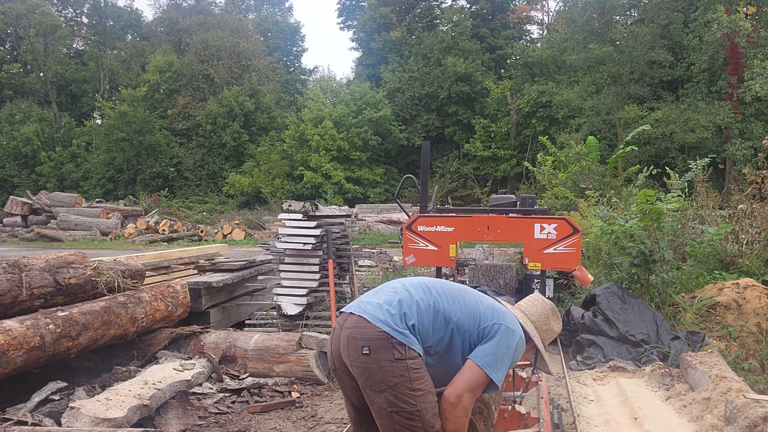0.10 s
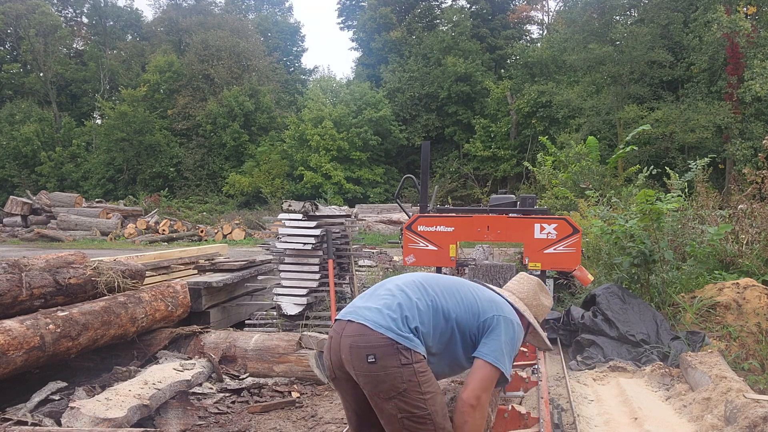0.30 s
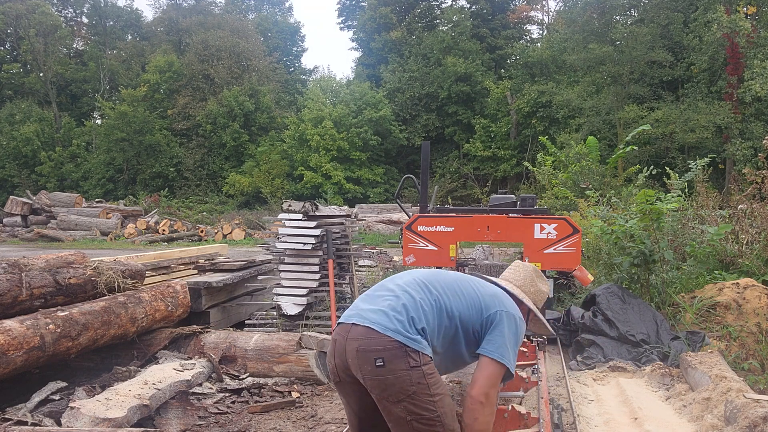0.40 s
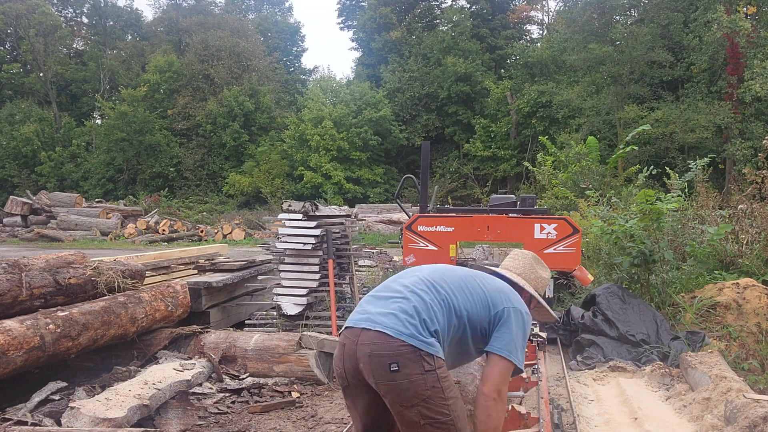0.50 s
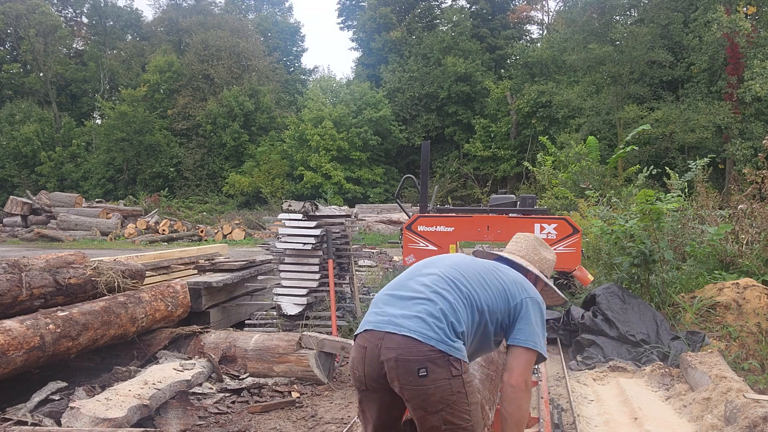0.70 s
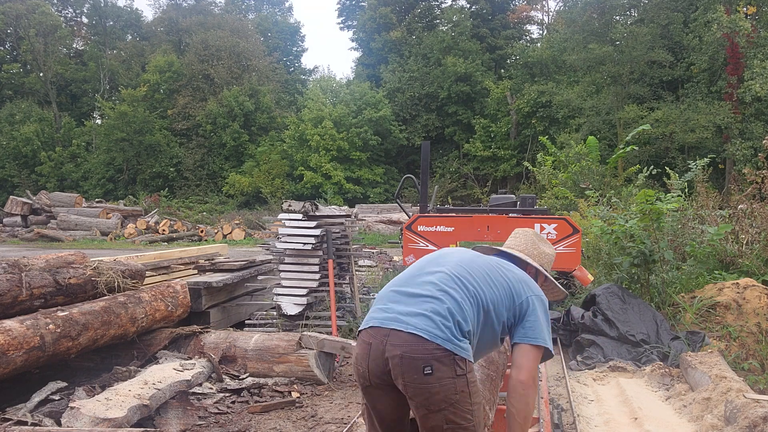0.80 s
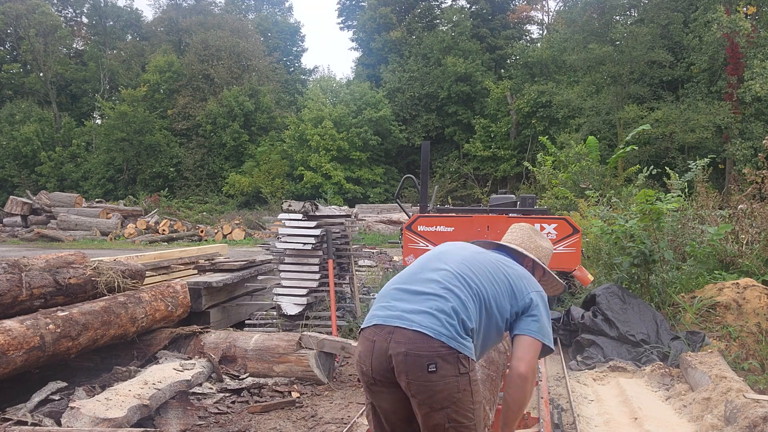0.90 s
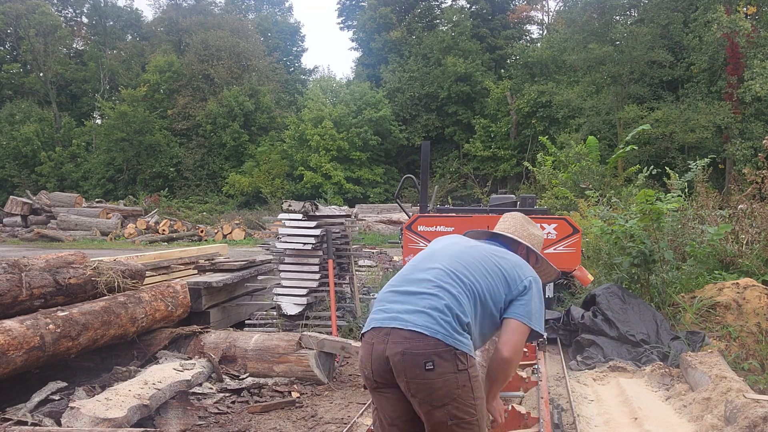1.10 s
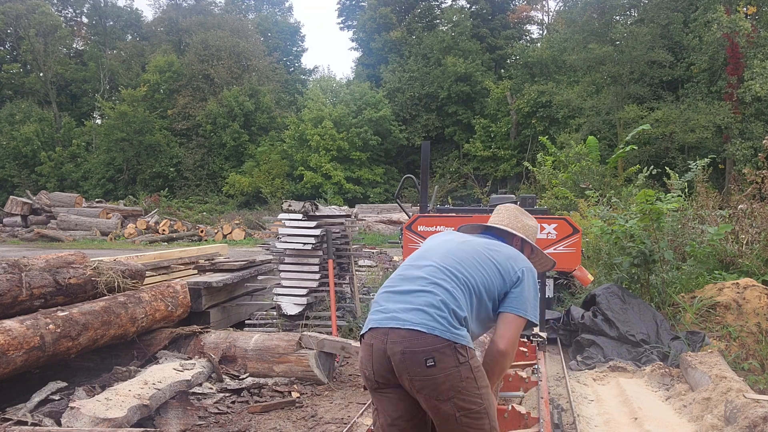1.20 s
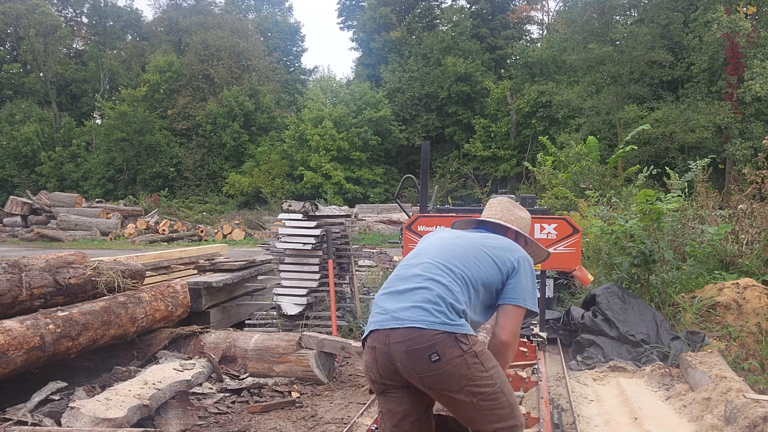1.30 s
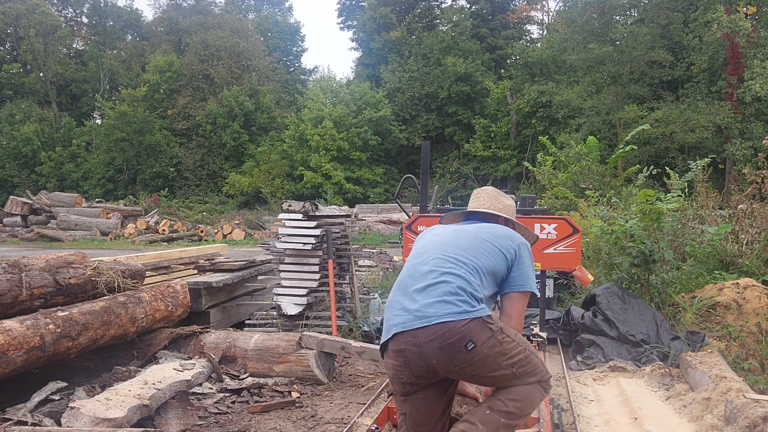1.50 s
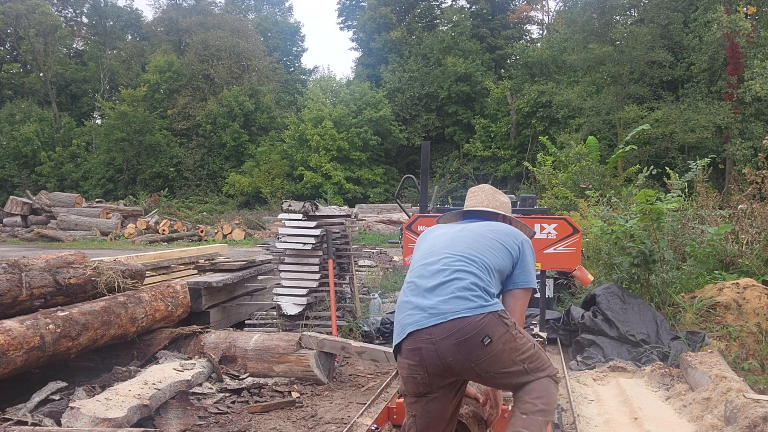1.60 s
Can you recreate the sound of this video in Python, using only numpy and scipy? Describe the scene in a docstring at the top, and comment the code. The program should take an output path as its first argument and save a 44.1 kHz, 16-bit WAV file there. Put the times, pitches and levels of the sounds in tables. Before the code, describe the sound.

A heavy log thumps onto a steel sawmill bed with crunching bark, over a faint cricket chorus

```python
"""In a wooded sawmill yard, a heavy log drops onto a steel bed: one deep thump, a boom and crunching bark.
Short pushes set the log and bed ringing; grains of noise make the bark, dust, scraping and scuffing.
Wobbling tones make the steel clanks, and more pushes a soft wooden knock; a faint echo tail follows them all.
Behind lie shaped-noise rumble and air, a cricket chorus of fluttering noise with nearer pulsed tones,
very high katydid ticks, and thin bird whistles made of gliding tones."""
import sys
import numpy as np
from scipy import signal
from scipy.fft import rfft, irfft
from scipy.io import wavfile

SR = 44100
rng = np.random.default_rng(int(sys.argv[2]) if len(sys.argv) > 2 else 0)


def waveform_to_disk(signal):
    """Save audio, clipped to [-1, 1], as 16-bit WAV at the path in sys.argv[1]."""
    frames = np.transpose(np.atleast_2d(signal))
    scaled = np.clip(frames, -1, 1) * 32767
    samples = np.round(scaled).astype(np.int16)
    wavfile.write(sys.argv[1], SR, samples)


N = 70560
T = np.arange(N) / SR  # time of each sample [s]


def from_db(db):
    """Turn decibels into a gain."""
    return 10 ** (np.asarray(db) / 20)


def rms_one(x):
    """Scale a sound to an average strength (rms) of 1."""
    return x / np.sqrt(np.mean(x ** 2) + 1e-20)


def level(rows):
    """Draw a gain curve through (time [s], level [dB]) points."""
    return from_db(np.interp(T, *np.transpose(rows)))


def pan(db):
    """Left and right gains that differ by this many dB; above zero is to the left."""
    return from_db(np.array([[db], [-db]]) / 2)


def at_hz(points, hz):
    """Read a table between its points, along a logarithmic frequency axis."""
    table_hz, value = np.transpose(points)
    return np.interp(np.log(hz + 1), np.log(table_hz), value)


def drift(rate):
    """Smooth random wander of rms 1; a higher rate [Hz] wanders faster."""
    r = np.exp(-2 * np.pi * rate / SR)
    wander = signal.lfilter([1], [1, -2 * r, r * r], rng.standard_normal(2 * N))
    return rms_one(wander[N:])  # the first half lets the filter settle


def tone(hz):
    """A sine wave that follows a changing pitch."""
    return np.sin(2 * np.pi * np.cumsum(hz) / SR)


def coloured(pair, spectrum):
    """Shape two unrelated signals into a stereo sound of rms 1 with this spectrum."""
    # how alike left and right are: (frequency [Hz], likeness [0 = unrelated, 1 = the same])
    likeness = [(25, 0.56), (60, 1), (250, 0.9), (500, 0.7), (1100, 0.019), (2200, 0.29), (4500, 0),
                (16000, 0)]
    hz = np.arange(N // 2 + 1) * SR / N
    alike = np.clip(at_hz(likeness, hz), -1, 1)
    mid, side = rfft(pair) * from_db(at_hz(spectrum, hz))
    shared = np.sqrt(1 + alike) * mid
    opposed = np.sqrt(1 - alike) * side * [[1], [-1]]
    return rms_one(irfft(shared + opposed, N))


def noise(spectrum):
    """Smooth stereo noise with a given spectrum."""
    return coloured(rng.standard_normal((2, N)), spectrum)


def grains():
    """Two streams of tiny fractures: clicks of random size and sign at random moments."""
    grains_per_s, spread_db = 5000, 2.5
    sizes = from_db(spread_db * np.minimum(rng.exponential(1, (2, N)), 4))
    signed = sizes * rng.choice([-1, 1], (2, N))
    return rms_one(signed * (rng.random((2, N)) < grains_per_s / SR))


def ring(force, modes):
    """A force sets a body's modes ringing: each is a resonance that takes t60 to fade by 60 dB."""
    out = 0
    for hz, db, t60 in modes:
        r = from_db(-60 / (t60 * SR))  # loss per sample
        w = 2 * np.pi * hz / SR
        # the tiny added force keeps the filter away from zero
        mode = signal.lfilter([.5, 0, -.5], [1, -2 * r * np.cos(w), r * r], force + 1e-18)
        out = out + from_db(db) * mode
    return out


def blows(rows):
    """One bell-shaped push per contact; longer contacts are duller."""
    out = 0
    for s, db, width in rows:
        bell = np.exp(-.5 * ((T - s) / width) ** 2)
        out = out + from_db(db) * bell / (np.sqrt(2 * np.pi) * width * SR)
    return out


def swell_and_fade(s, db, rise_s, t60):
    """A gain that rises in a straight line from time s, then fades by 60 dB in t60 seconds."""
    fade = from_db(db - 60 * np.maximum(T - s - rise_s, 0) / t60)
    return fade * np.clip((T - s) / rise_s, 0, 1)


def bursts(rows):
    """A gain curve of quick attacks that die away."""
    attack_s = 0.0038
    return sum(swell_and_fade(s, db, attack_s, t60) for s, db, t60 in rows)


def rub(envelope, spectrum, ring_db):
    """Grains under a gain curve, heard directly and through the ringing steel fittings."""
    # steel fittings on the bed: (frequency [Hz], level [dB], fade time t60 [s])
    steel_modes = [(565, -12, .2), (667, -15, .14), (759, -11, .16), (897, -9, .16), (962, -10, .13),
                   (1100, -2, .12), (1122, -2, .11), (1207, -5, .12), (1309, -1, .13), (1402, -3, .13),
                   (1515, -9, .12), (1980, -16, .11), (2578, -15, .14), (3095, -17, .16), (3680, -17, .07)]
    grit = coloured(grains(), [(SR, 0)])  # flat spectrum
    steel = ring(grit * envelope, steel_modes) / np.std(ring(grit, steel_modes))
    return coloured(grains(), spectrum) * envelope + from_db(ring_db) * steel


def log_thump():
    """The log lands and rocks: each push rings its own dead thud and the boom of the loaded bed."""
    # the log meets the bed: (time [s], level [dB], contact half-width [s])
    thumps = [(0.192, -20.5, 0.0018), (0.2056, 1, 0.00081), (0.433, -28, .0025), (0.485, -32, 0.0062),
              (0.65, -30, 0.0026)]
    # the log's own thud: (frequency [Hz], level [dB], fade time t60 [s])
    log_modes = [(127.5, -13.5, 0.058), (183.3, -15, 0.1)]
    # the loaded steel bed: (frequency [Hz], level [dB], fade time t60 [s])
    bed_modes = [(50.8, -20, 0.23), (58.7, -38.5, 1.7), (64.3, -18.5, 0.28), (84.5, -21.5, 0.38),
                 (100.1, -23, 0.33), (109, -26.5, 0.22), (151.5, -25.5, 0.23), (204.7, -28, 0.42),
                 (217.8, -37, 0.69), (246.4, -44.5, 0.78), (284.8, -33.5, 0.55), (336.8, -23.5, .3),
                 (401, -25, 0.27), (424, -25, 0.29)]
    low_cut_hz, pan_db = 46, 1
    boom = ring(blows(thumps), log_modes + bed_modes)
    low_cut = signal.butter(4, low_cut_hz, "high", fs=SR, output="sos")
    return signal.sosfilt(low_cut, boom) * pan(pan_db)


def bark():
    """Bark crushes and grit ticks as bursts of grains that also ring the steel; crumbs and sawdust spray."""
    # bark crushed under the log: (time [s], level [dB], fade time t60 [s])
    crunches = [(0.2015, -44, 0.099), (0.216, -56, 0.15), (0.232, -60.5, 0.078), (0.243, -56.5, 0.15),
                (0.278, -49.5, 0.075), (0.297, -74, 0.045), (0.331, -69.5, 0.12)]
    # small ticks of grit: (time [s], level [dB], fade time t60 [s])
    ticks = [(0.632, -85, 0.027), (0.944, -73.5, 0.061), (1.016, -84, 0.024), (1.301, -64.5, 0.081),
             (1.375, -94, 0.034)]
    # tone colour of crushed bark: (frequency [Hz], level [dB])
    bark_colour = [(300, -0.5), (500, -0.5), (1200, 0.5), (1600, -28), (2000, -24), (3600, -22),
                   (5500, -15.5), (7500, -24.5), (10000, -47), (16000, -46)]
    # spraying crumbs and sawdust: (time [s], level [dB], fade time t60 [s])
    sprays = [(0.205, -67.5, .06), (0.218, -57, 0.12)]
    # tone colour of the spray: (frequency [Hz], level [dB])
    dust_colour = [(3000, -22), (5400, 13.5), (7000, -8), (10000, -17), (15000, 0)]
    crushed = rub(bursts(crunches + ticks), bark_colour, ring_db=-0.5)
    return crushed + bursts(sprays) * coloured(grains(), dust_colour)


def clank():
    """Each brief slip of a steel fitting pumps one unsteady resonance, which the log's weight damps at once."""
    # steel fittings slip: (time [s], pitch [Hz], level [dB])
    slips = [(0.2, 3700, -57), (0.226, 5500, -54.5), (0.24, 1368, -48.5), (0.242, 5104, -54),
             (0.2794, 1115, -35.5), (0.279, 2535, -58), (0.285, 1340, -47), (0.296, 1153, -51),
             (0.316, 1124, -57)]
    rise_s, t60_s, wobble = 0.01, 0.032, .018  # wobble is a share of the pitch
    out = 0
    for s, hz, db in slips:
        pitch = hz * (1 + wobble * drift(150))
        out = out + swell_and_fade(s, db, rise_s, t60_s) * tone(pitch)
    return out


def scrape():
    """The settling log scrapes: a rising and falling stream of grains that also rings the steel."""
    # strength of the scraping: (time [s], level [dB])
    strength = [(0, -105), (0.17, -72), (0.31, -66), (0.36, -73), (0.56, -73.5), (0.66, -67), (0.70, -81.5),
                (0.82, -103), (0.92, -80.5), (1.02, -71), (1.06, -77.5), (1.17, -83.5), (1.22, -72),
                (1.26, -84), (1.38, -69), (1.41, -78), (1.465, -74), (1.505, -63.5), (1.535, -70),
                (1.6, -73.5)]
    # tone colour of the scraping: (frequency [Hz], level [dB])
    colour = [(250, -15), (450, -6.5), (620, -4.5), (850, -1.5), (1200, -1.5), (1650, -1), (2050, -10.5),
              (2400, -12.5), (3300, -12), (6000, -10.5), (9500, -23.5), (11000, -29.5), (15000, -29)]
    return rub(level(strength), colour, ring_db=-4.5)


def knock():
    """Soft wooden knocks: a cluster of short pushes rings a few low modes."""
    # contacts: (time [s], level [dB], contact half-width [s])
    contacts = [(0.852, -50.5, 0.00033), (0.857, -62.5, 0.00017), (0.867, -51, 0.00047),
                (0.875, -52, 0.00026), (0.892, -72, 0.0003)]
    # the knocked wood: (frequency [Hz], level [dB], fade time t60 [s])
    wood_modes = [(205, -2.5, 0.077), (310, 0, 0.061), (412.6, -1, 0.14), (456, -38, 0.038),
                  (600, -14, .05)]
    return ring(blows(contacts), wood_modes)


def scuff():
    """Wood rubs briefly on the bed: a short swell of grains that also rings the steel."""
    # strength of the rubbing: (time [s], level [dB])
    strength = [(1.47, -82), (1.503, -60), (1.535, -63.5), (1.6, -74.5)]
    # tone colour of the rubbing: (frequency [Hz], level [dB])
    colour = [(500, -15), (900, -6), (1150, 9), (1370, -2.5), (1650, -22), (2100, -27), (8000, -42)]
    started = T > strength[0][0]
    return rub(level(strength) * started, colour, ring_db=-1)


def yard(x):
    """Faint scatter from log piles and trees: a fading noise tail, different in each ear."""
    t60_s, scatter_db = 0.09, -16.5
    tail = rng.standard_normal((2, N)) * from_db(-60 * T / t60_s) * (T > .008)  # starts after 8 ms
    band = signal.butter(2, [350, 6000], "band", fs=SR, output="sos")
    tail = signal.sosfilt(band, tail)
    tail = tail / np.sqrt(np.sum(tail ** 2) / 2)
    return from_db(scatter_db) * signal.fftconvolve(x, tail, axes=1)[:, :N]


def bird():
    """Thin whistles: each tone swells and fades along a slightly rough arc of pitch."""
    # (start [s], length [s], start pitch [Hz], middle pitch [Hz], end pitch [Hz], middle level [dB])
    whistles = [(-0.04, .09, 8500, 8430, 8000, -75), (0.069, 0.13, 8350, 8610, 8440, -68.5),
                (1.289, 0.14, 9000, 8660, 8200, -74), (1.442, 0.13, 8500, 8460, 8340, -72.5)]
    rough_hz, pan_db = 70.8, -9
    out = 0
    for s, length, start_hz, middle_hz, end_hz, db in whistles:
        progress = np.clip((T - s) / length, 0, 1)
        arc = np.interp(progress, [0, .5, 1], [start_hz, middle_hz, end_hz])
        whistle = tone(arc + rough_hz * drift(130)) * np.sin(np.pi * progress)
        out = out + whistle * from_db(db + 2 * drift(50))  # the level flickers a little
    return out * pan(pan_db)


def crickets():
    """A far chorus of fluttering noise and a few nearer pulsed trills, swelling together."""
    # tone colour of the far chorus: (frequency [Hz], level [dB])
    chorus_colour = [(3000, -47), (3800, -15), (4150, -4), (4500, -1), (4900, 5.5), (5200, 2), (5550, -4.5),
                     (6000, -2), (6450, -4.5), (7000, -14.5), (7800, -29.5), (9000, -61)]
    # nearer crickets: (pitch [Hz], pulse rate [per s], level [dB], pan [dB])
    near_crickets = [(4295, 56, -77, 14), (4640, 43, -84, -19.5), (4940, 70, -77.5, -19.5),
                     (6260, 27, -84, -4.5)]
    # slow swell of all the crickets: (time [s], level [dB])
    slow_swell = [(0, -2), (0.3, -0.5), (0.55, 1), (0.78, -1.5), (1.15, -0.5), (1.4, 1.5), (1.6, 1)]
    chorus_db, flutter_db, chorus_pan_db = -64.5, 2.27, -1
    wander_hz, trill_swell_db = 25.4, 3.5
    flutter = np.array([drift(34), drift(35)])  # separate for left and right
    out = noise(chorus_colour) * from_db(chorus_db + flutter_db * flutter) * pan(chorus_pan_db)
    for hz, rate, db, pan_db in near_crickets:
        # squaring a sine gives two pulses per cycle, hence half the rate
        strokes = tone(rate / 2 * (1 + 0.033 * drift(2.7))) ** 2
        trill = 2 * strokes * tone(hz + wander_hz * drift(52.7))
        out = out + trill * from_db(db + trill_swell_db * drift(1.33)) * pan(pan_db)
    return out * level(slow_swell)


def katydid():
    """Faint, very high ticks from the left: a wavering tone let through in short pulses."""
    pitch_hz, ticks_per_s, tick_db, pan_db = 11400, 11.8, -95, 13.5
    ticks = tone(np.full(N, ticks_per_s / 2)) ** 10  # a high power makes narrow pulses
    return ticks * tone(pitch_hz + 100 * drift(300)) * from_db(tick_db) * pan(pan_db)


def rumble():
    """Low rumble of the shifting log and the yard: deep noise that rises and falls."""
    # strength of the rumble: (time [s], level [dB])
    strength = [(0, -61), (0.17, -53.5), (0.3, -39), (0.42, -54.5), (0.66, -55.5), (0.74, -60.5),
                (1.0, -55), (1.4, -58.5), (1.52, -55), (1.6, -56)]
    # tone colour of the rumble: (frequency [Hz], level [dB])
    colour = [(20, -14), (35, 2), (55, 1), (85, -0.5), (130, -5), (200, -16), (270, -23), (340, -16.5),
              (420, -18.5), (500, -31), (900, -43), (2000, -83)]
    return level(strength) * noise(colour)


def air():
    """Steady, faint noise of the air in the yard."""
    # tone colour of the air: (frequency [Hz], level [dB])
    colour = [(200, -8.5), (450, -2.5), (850, 1), (1500, -4), (2800, -14.5), (8000, -28.5), (9300, -10),
              (10800, -26.5), (15000, -17)]
    air_db, pan_db = -76.5, 1.5
    return from_db(air_db) * noise(colour) * pan(pan_db)


def scene():
    """Log and bed in front with their scatter; bird, insects, rumble and air around them."""
    work = log_thump() + bark() + clank() + scrape() + knock() + scuff()
    background = bird() + crickets() + katydid() + rumble() + air()
    return work + yard(work) + background


def record(dry):
    """Cut the very top of the sound steeply."""
    cutoff_hz = 15750
    top_cut = signal.ellip(10, .1, 80, cutoff_hz, fs=SR, output="sos")
    return signal.sosfilt(top_cut, dry)


dry = scene()
out = record(dry)
waveform_to_disk(out)
```